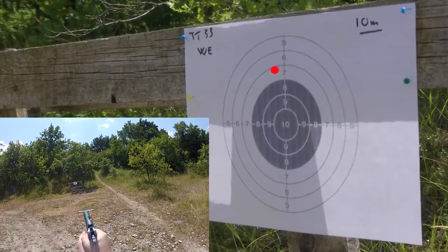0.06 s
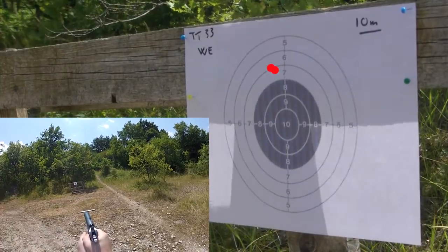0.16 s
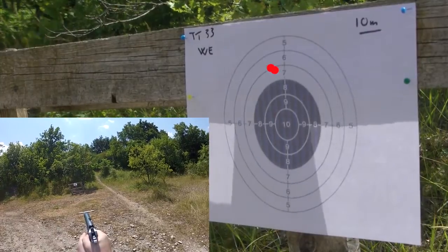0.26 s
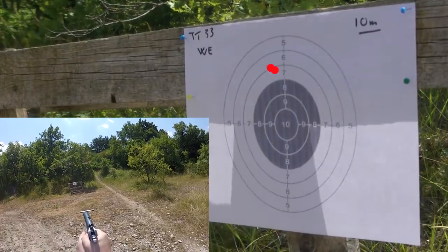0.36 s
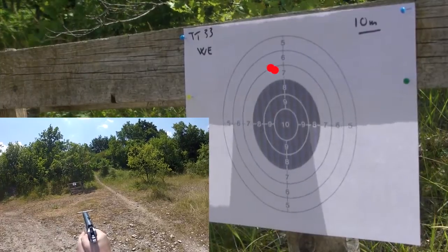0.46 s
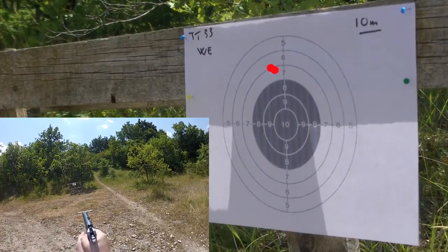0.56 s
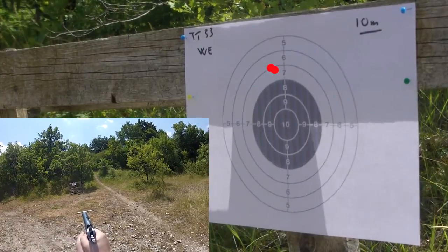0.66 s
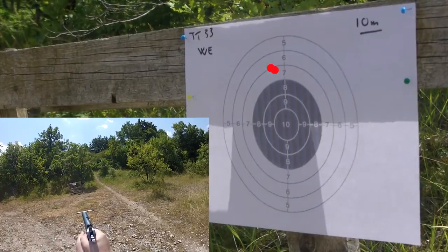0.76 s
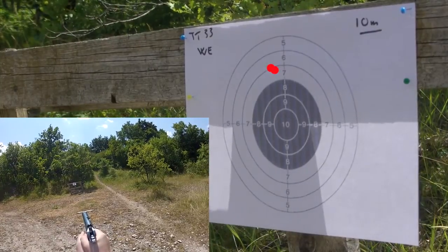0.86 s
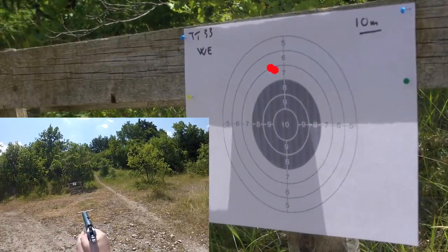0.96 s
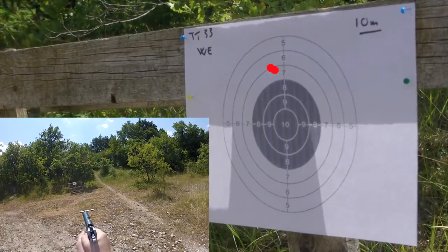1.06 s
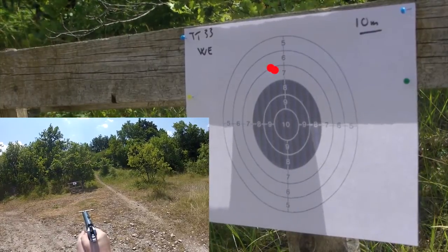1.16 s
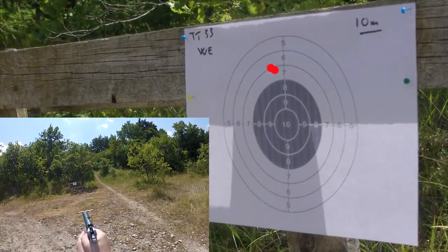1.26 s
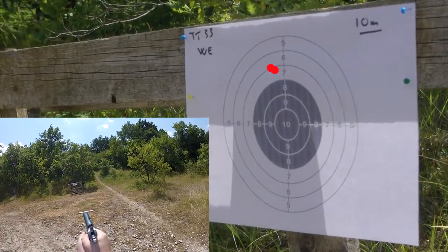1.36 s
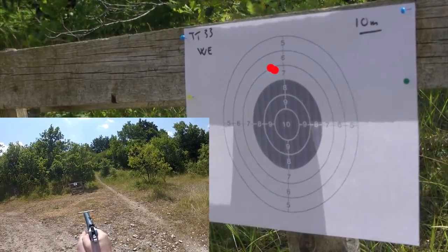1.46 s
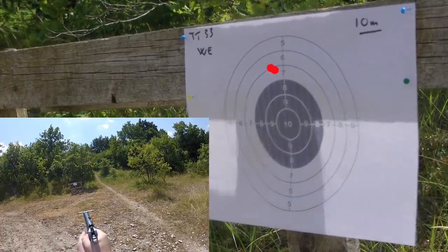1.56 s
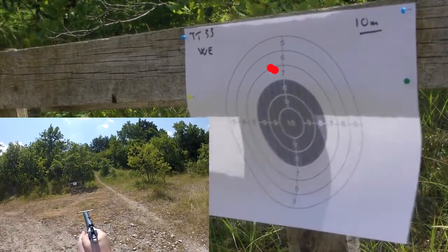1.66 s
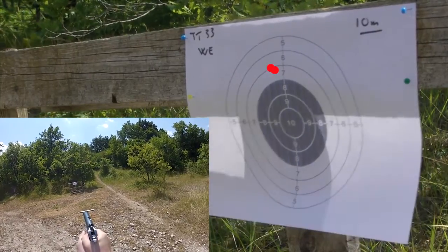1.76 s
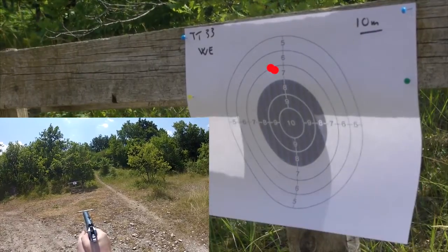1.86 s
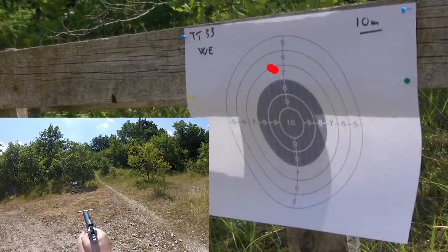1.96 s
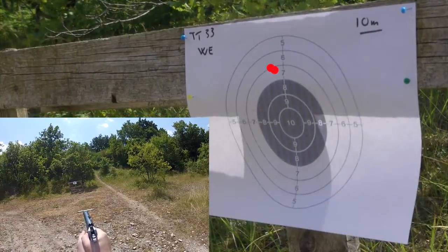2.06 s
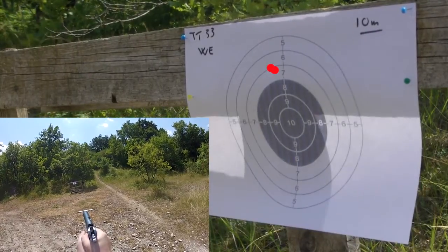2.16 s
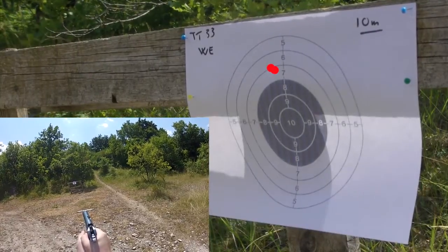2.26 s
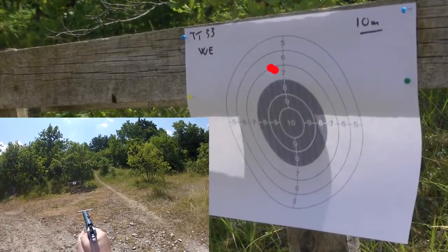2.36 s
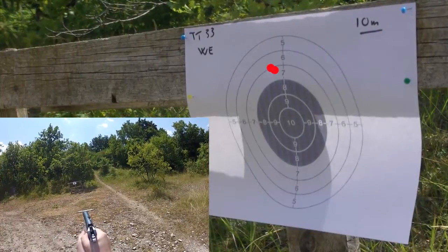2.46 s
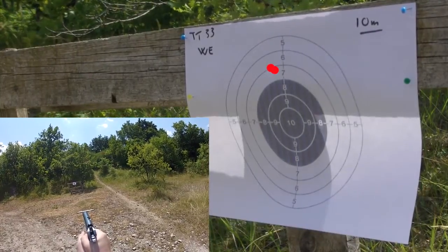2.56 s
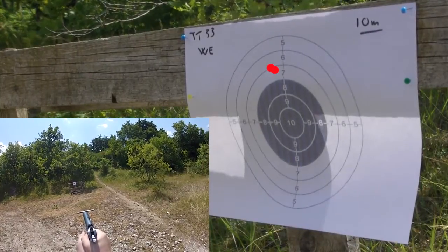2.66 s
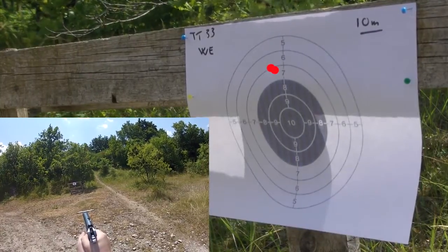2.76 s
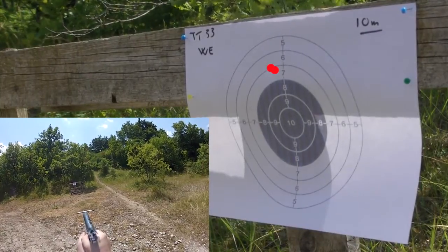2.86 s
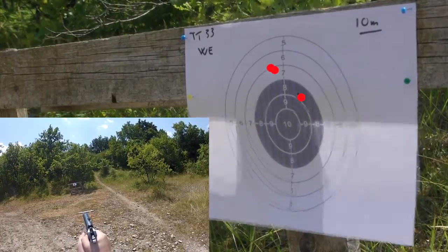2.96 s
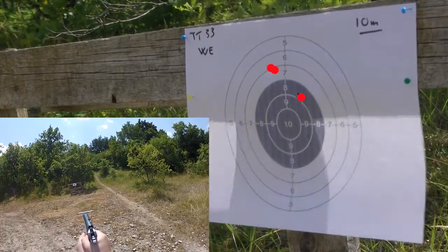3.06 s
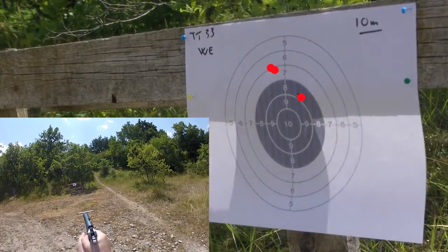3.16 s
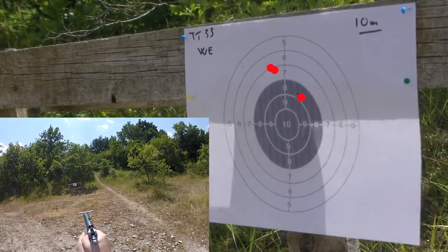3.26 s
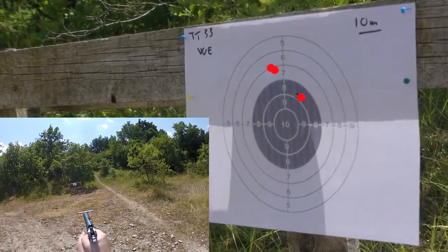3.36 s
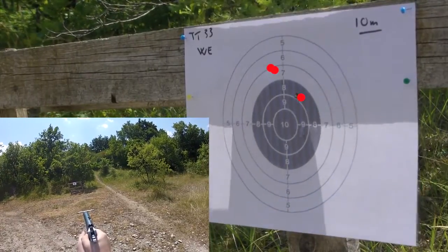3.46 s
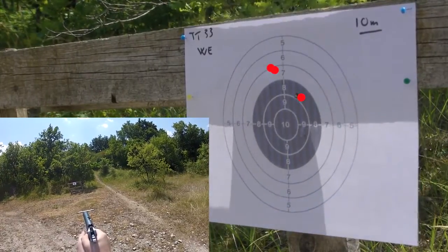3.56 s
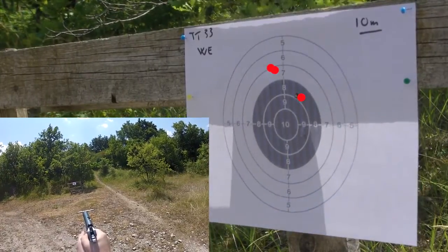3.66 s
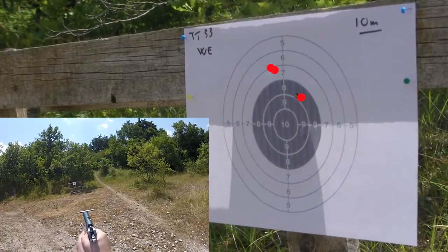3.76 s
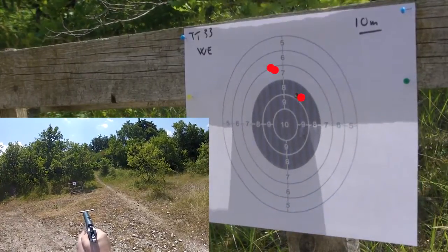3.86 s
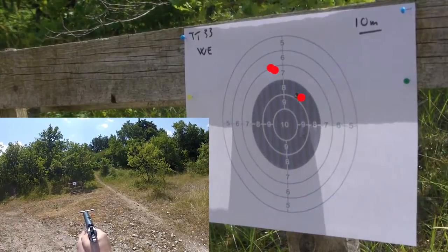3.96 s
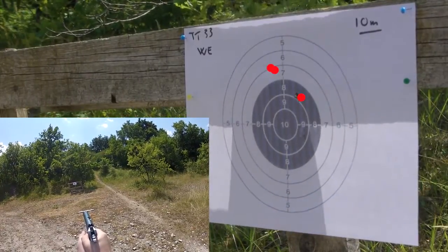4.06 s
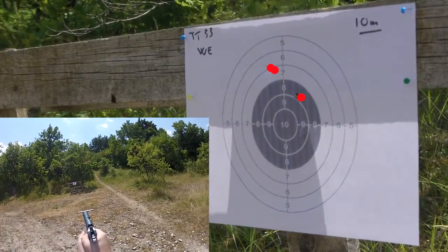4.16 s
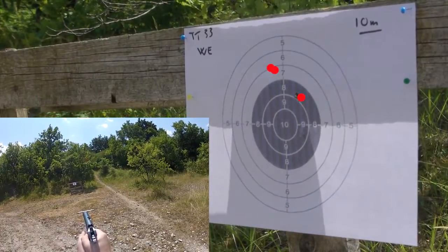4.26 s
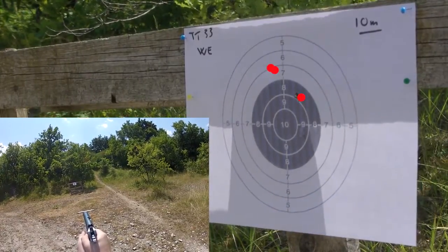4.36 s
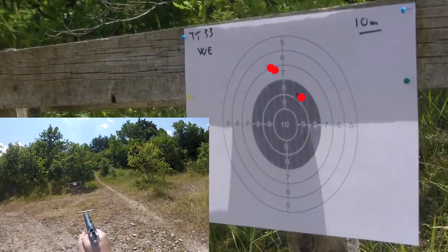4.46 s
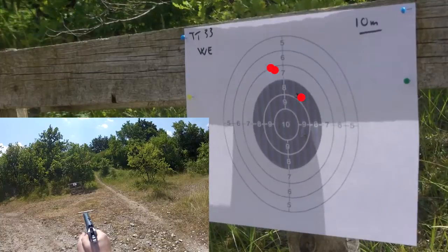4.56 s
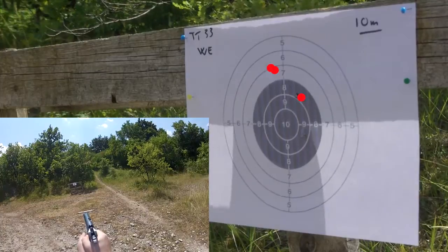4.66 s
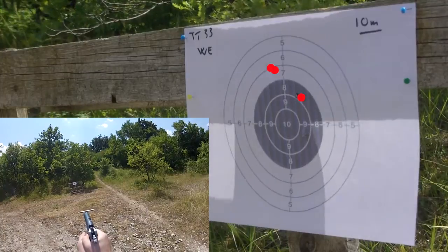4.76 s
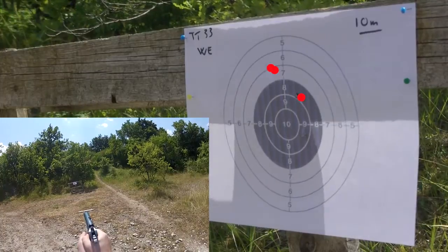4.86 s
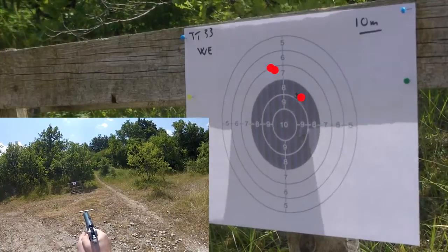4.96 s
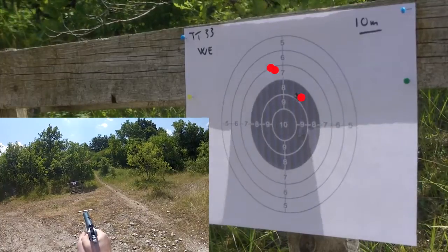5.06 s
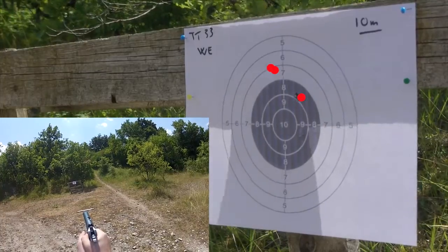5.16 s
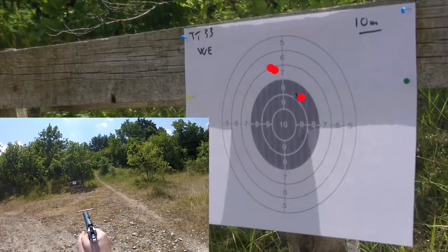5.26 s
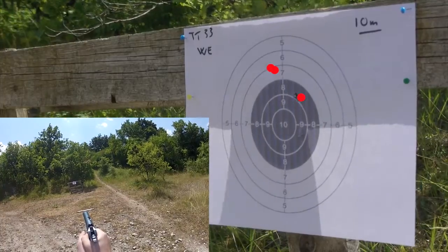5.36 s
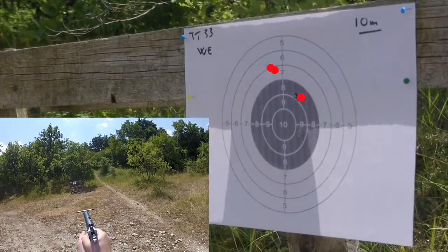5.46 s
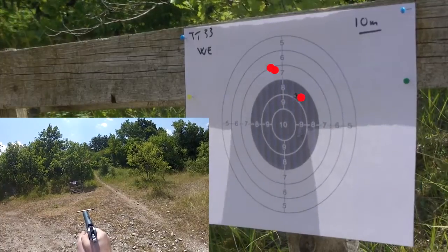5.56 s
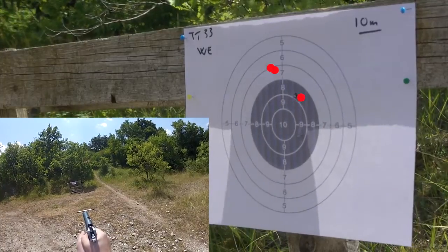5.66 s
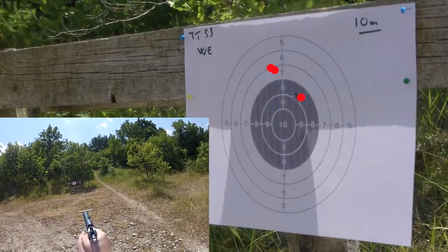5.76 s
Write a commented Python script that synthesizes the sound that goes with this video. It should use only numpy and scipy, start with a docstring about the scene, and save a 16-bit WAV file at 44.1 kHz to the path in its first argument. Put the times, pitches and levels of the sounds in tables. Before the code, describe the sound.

A toy gas pistol snaps four times with metallic slide clacks; pellets smack paper and wood while wind buffets the microphones.

```python
"""A gas blowback toy pistol fires four slow shots at a paper target on a wooden rail in open scrubland.
Wind rumble, eddy thumps, hiss and a faint whine run throughout. Each shot: gas bursts and low suction, then
the slide's slam, then bush echoes. The first three pellets crack on the target, ring the rail and rattle the
paper; small bounces follow, and are all that follows the fourth shot. One camera stands by the shooter, one by
the target; their sounds are mixed. The target camera cuts its gain on loud sounds and recovers slowly."""
import sys
import numpy as np
from scipy import signal
from scipy.fft import rfft, irfft
from scipy.io import wavfile
from scipy.ndimage import uniform_filter1d

SR = 44100
rng = np.random.default_rng(int(sys.argv[2]) if len(sys.argv) > 2 else 0)


def write(x):
    x = np.atleast_2d(x).T
    wavfile.write(sys.argv[1], SR, np.round(np.clip(x, -1, 1) * 32767).astype(np.int16))


N = 255780

# pan_db is left over right throughout
# wind level at the two ports: time_s, left_db, right_db
WIND_LEVELS = [(0, -55, -48), (.3, -38, -45.5), (.55, -41, -50), (.68, -53, -57), (.85, -42, -40.5),
               (1.17, -36.5, -41.5), (1.45, -49, -53.5), (1.801, -44, -49), (2.35, -53.5, -54),
               (2.55, -36.5, -43.5), (2.76, -36.5, -38.5), (2.999, -39, -46), (3.2, -35.5, -42),
               (3.55, -41.5, -41.5), (3.8, -43, -45), (4.172, -57, -53), (4.65, -43.5, -51),
               (5.0, -52, -43), (5.45, -53.5, -57), (5.65, -42.5, -45), (5.8, -55, -54)]
# wind spectrum: freq_hz, density_db_per_hz
WIND_SPECTRUM = [(15, 0.5), (40, 6), (90, 2.5), (150, -2), (200, -8), (300, -20), (500, -68)]
# single eddies thumping the microphone: center_s, peak_db, freq_hz, half_width_cycles, pan_db
EDDIES = [(0.366, -33.5, 108, 1.06, 14.5), (0.846, -43, 132, 1.2, 11), (1.095, -40.5, 203, 0.87, 1),
          (1.286, -31, 168, 0.61, 7), (3.216, -35.5, 71, 0.44, 15), (3.289, -37, 70, 0.74, 6),
          (3.759, -35.5, 155, 0.55, 8), (3.913, -40.5, 163, 0.92, -2), (4.049, -42.5, 55.8, 0.88, 7),
          (4.951, -40.5, 116, 0.72, -9), (5.684, -35, 168, 0.59, 9)]
# hiss spectrum: freq_hz, density_db_per_hz
HISS_SUM = [(88, -68), (150, -7.5), (186, -5.5), (239, -5), (274, -3), (360, -3), (511, -2), (1200, -5),
            (1300, -8.5), (2720, -9), (13400, -19.5), (15700, -36.5)]
# strong, as the ports are subtracted to widen the image: freq_hz, density_db_per_hz
HISS_DIFFERENCE = [(88, -23), (150, 0), (179, -1), (315, -0.5), (601, -2.5), (759, -3), (2700, -17.5),
                   (3700, -21.5), (13400, -32), (16000, -86)]
# target camera electronics, before its gain control: freq_hz, peak_db, left_lead_rad
WHINE_TONES = [(10492, -78, .6), (13124, -64, 2.4), (13964, -81, .6)]
# color of bush echoes: freq_hz, level_db
SCRUB_COLOR = [(300, -39), (1000, -9), (2500, -7.5), (5000, -1.5), (5750, 0), (6500, -1.5), (8000, -1.5),
               (12000, -7.5), (16000, -17)]
# left-right likeness of bush echoes: freq_hz, likeness (0-1)
SCRUB_LIKENESS = [(300, 0.55), (1500, 0.95), (3000, 0.69), (7000, 0.092), (15000, 0.23)]
# rail modes: freq_hz, level_db, t60_s (before ring_share)
RAIL_MODES = [(1126, -5, 0.028), (1647, -12, 0.07), (2110, -2.5, 0.058), (2800, -2, 0.025),
              (3640, -2.5, 0.03), (4440, -24, 0.027)]
# color of the paper rattle: freq_hz, level_db
PAPER_COLOR = [(500, -3), (1200, -7), (3000, -5.5), (6000, -2), (10000, -2), (16000, -23)]
# pellets hitting the target: start_s, crack_db, crack_hz, second_lag_s, second_db, rail_db, rail_place (0-1),
# rattle_db, thud_db, far_crack_db, far_rail_db; second, rail and rattle are relative to the crack
TARGET_STRIKES = [(0.1281, 3.5, 6500, .00137, -3.5, -9.5, 0.27, -7.5, -15.5, -9, -20),
                  (1.4675, -2.5, 7240, 0.00073, -25, -35, 0.15, -15, -36, -16, -32),
                  (2.96, 4, 7840, .0012, -2, -15, 0.19, -12, -37, -11.5, -8)]
# spent pellets and chips near the target: start_s, crack_db, crack_hz, rattle_db (re crack), rattle_t60_s
PELLET_BOUNCES = [(.162, -23, 5370, 10, .02), (0.38, -31, 3500, -5, .036), (1.421, -24, 5000, -7, 0.018),
                  (1.619, -21, 6900, -5, .026), (1.6247, -17, 6700, 2, 0.0093),
                  (2.1017, -41.5, 8200, 0, 0.038), (2.2315, -38.5, 9000, -2.5, .015),
                  (3.017, -22, 9000, 3, 0.021), (4.5781, -23, 6100, -7.5, 0.045),
                  (4.6114, -21, 6600, 1, 0.042), (4.62, -21.5, 8200, -5, 0.068)]
# shots: blast_s, gas_db, slam_lag_s, slam_db, draught_db (left port), suction_pan_db
SHOT_ROWS = [(.0215, 0, .047, -14.5, -9, 2.5), (1.3018, -0.5, 0.044, -12, -8, 2),
             (2.8539, 0, .0453, -12, -20, 4), (4.4479, 0.5, 0.046, -10.5, 2.5, -5)]
# trigger, valve, muzzle blast, slide flung back, vent, last hiss:
# lag_s (from blast), level_db, rise_s, t60_s, pan_db
GAS_BURSTS = [(-.012, -22, 0.00073, 0.0098, 9.5), (-.0057, -14, 0.0018, 0.041, -7),
              (0, 1.5, .0017, 0.027, 7), (.0068, -2.5, 0.0012, 0.0088, -3.5),
              (0.0102, 2.5, 0.00087, 0.0087, -8.5), (.014, -10.5, .001, 0.031, 2.5)]
# slide slams home, then bounces: lag_s (from slam), level_db (re slam), rise_s, t60_s, pan_db
SLIDE_SLAMS = [(0, 0, 0.00021, 0.022, -2), (.005, -14.5, 0.00037, 0.064, 0)]
# barrel puff, suction, its slow swing: lag_s (from blast), depth_db, freq_hz, t60_s
PRESSURE_DIPS = [(.0016, -9.5, 395, .03), (.0077, -3, 165, .022), (.0012, -14, 58, .05)]
# gas noise, sum and difference of the ports: freq_hz, density_db_per_hz
GAS_SUM = [(150, -21), (290, -9.5), (500, -3.5), (750, -4), (1050, 1), (1510, -3), (1980, -2), (2260, -2),
           (2500, -3.5), (4660, 1.5), (8830, -7), (12900, -14), (16000, -66)]
GAS_DIFFERENCE = [(290, -38), (500, -1), (1140, -8.5), (1440, -10), (1980, -11), (2810, -6), (3340, -4.5),
                  (4530, -4), (5470, 4.5), (7310, -3), (9920, -3), (16000, -31)]
# slide noise, sum and difference of the ports: freq_hz, density_db_per_hz
METAL_SUM = [(290, -51), (500, -25), (761, -27), (1060, -24), (1870, -12.5), (3810, -3), (4660, -8),
             (5020, -3), (12000, -16.5), (16000, -38)]
METAL_DIFFERENCE = [(290, -84), (500, -54), (1320, -27), (2190, -22), (2890, -8), (3440, -18), (3750, -9),
                    (4660, -6), (6700, -2), (16000, -23.5)]
# pistol frame modes: freq_hz, level_db, t60_s
FRAME_MODES = [(1130, -13.5, 0.026), (1964, -16.5, 0.051), (2555, -9, 0.051), (3000, -8.5, 0.035),
               (4010, -21, 0.1), (5580, -33, 0.028)]

CARRY_S = .0447  # way from target to shooter, and the offset between the cameras
THUD_HZ, THUD_T60_S, RATTLE_T60_S = 420, .0078, .05
SKIP_S, SKIP_DB, BOUNCE_RAIL_DB, BOUNCE_PLACE = .00128, -9, -14, .33  # place along the rail, 0-1
FAR_PLACE, FAR_HZ, FAR_RATTLE_DB, FAR_T60_S = .506, 6250, -11.5, .022
DRAUGHT_S, DRAUGHT_HZ, DRAUGHT_T60_S = .0029, 190, .014  # vented gas reaches the left port alone
THRESHOLD_DB, RECOVERY_DB_PER_S, SLOPE = -29.5, 46, .7  # recovery before the slope
CLIP_LEVEL, EDGE_HZ = .9, 16200


def amp(db):
    """Gain of a dB value."""
    return 10 ** (np.asarray(db) / 20)


def evened(x):
    """Scaled to rms 1."""
    return x / np.sqrt(np.mean(x ** 2) + 1e-20)


def read(points, hz):
    """A table read on a log-frequency axis."""
    f, value = np.transpose(points)
    return np.interp(np.log(hz + 1), np.log(f + 1), value)


def add(mix, s, sound):
    """Mixes a sound in at s seconds."""
    part = mix[..., round(s * SR):][..., :sound.shape[-1]]
    part += sound[..., :part.shape[-1]]


def sides(pan_db):
    """Left and right gains."""
    return amp([[pan_db / 2], [-pan_db / 2]])


def pair_noise(size, mid, side, side_db, tied):
    """Noise at two close ports: the difference runs a quarter turn behind the sum as far as it is tied to it."""
    hz = np.fft.rfftfreq(size, 1 / SR)
    a, b = rfft(rng.standard_normal((2, size)))
    total = a * amp(read(mid, hz))
    mixed = tied * a + np.sqrt(1 - tied ** 2) * b
    gap = -1j * mixed * amp(read(side, hz) + side_db)
    return evened(irfft(np.array([total + gap, total - gap]), size))


def ring(modes, size):
    """Impulse response of a set of modes: decaying sines."""
    t = np.arange(size) / SR
    return sum(amp(db - 60 * t / t60) * np.sin(2 * np.pi * hz * t) for hz, db, t60 in modes)


def wind():
    """Lumpy low rumble, mostly separate at each port and a little opposed."""
    hz = np.fft.rfftfreq(N, 1 / SR)
    s, *levels_db = np.transpose(WIND_LEVELS)
    left, other = irfft(rfft(rng.standard_normal((2, N))) * amp(read(WIND_SPECTRUM, hz)), N)
    right = other - .62 * left
    lumps = uniform_filter1d(uniform_filter1d(rng.standard_normal((2, N)), 1500), 1500)
    rumble = np.array([evened(left), evened(right)]) * amp(4.6 * evened(lumps))
    return evened(rumble) * amp([np.interp(np.arange(N) / SR, s, db) for db in levels_db])


def eddy_thumps():
    """Each eddy is a short low wave packet, its phase slightly different at each port."""
    out, t = np.zeros((2, N)), np.arange(-2000, 2000) / SR
    for s, db, hz, cycles, pan_db in EDDIES:
        phase_cycles = rng.random((2, 1)) * .089
        packet = np.cos(2 * np.pi * (hz * t + phase_cycles)) * np.exp(-(t * hz / cycles) ** 2)
        add(out, s + t[0], amp(db) * packet * sides(pan_db))
    return out


def electronic_whine():
    """Steady high sines; the left port leads in phase."""
    t = np.arange(N) / SR
    return sum(amp(db) * np.sin(2 * np.pi * hz * t + np.array([[lead], [0]])) for hz, db, lead in WHINE_TONES)


def echoes(x, db, t60, onset, air_hz):
    """Scattering off countless leaves: the sound's energy returns as noise that builds up and dies, treble first."""
    hop = 64
    frames, hz, t = N // hop + 4, np.fft.rfftfreq(256, 1 / SR)[:, None], np.arange(700) * hop / SR
    energy = np.bincount(np.arange(N) // hop, (x ** 2).mean(0), frames)
    fade_s = t60 / (1 + (hz / air_hz) ** 2)  # air eats the treble
    buildup = 1 - np.exp(-(t / onset) ** 2)
    shape = (amp(read(SCRUB_COLOR, hz) - 60 * t / fade_s) * buildup) ** 2
    power = signal.fftconvolve(energy[None], shape / shape.sum(), axes=1)[:, :frames]
    a, b, c, d, clumps = rng.standard_normal((frames, len(hz), 5)).T
    clumps = uniform_filter1d(clumps, size=20, axis=0)
    clumps = evened(uniform_filter1d(clumps, size=6, axis=1))  # single bushes stand out
    same = read(SCRUB_LIKENESS, hz)
    left = a + 1j * b
    right = same * left + np.sqrt(1 - same ** 2) * (c + 1j * d)
    bins = np.array([left, right]) * np.sqrt(abs(power)) * amp(2.5 * clumps)
    return amp(db) * signal.istft(bins, nperseg=256, noverlap=192)[1][:, :N]


def rail_ring(place, ring_share, size):
    """Rail modes; a blow near a node of a mode leaves that mode quiet."""
    rail = np.zeros(size)
    for k, (hz, db, t60) in enumerate(RAIL_MODES):
        coupling = abs(np.sin(np.pi * (k + 1) * place))
        rail += coupling * ring([(hz, db, ring_share * t60)], size)
    return rail


def strikes(rows, ring_share):
    """One-cycle crack, second contact, ringing rail and paper rattle; so small a pellet makes no bass."""
    out, t, lead_s = np.zeros((2, N)), np.arange(3000) / SR, 8 / SR
    for s, db, hz, later, second_db, rail_db, place, rattle_db, t60 in rows:
        u = np.pi * hz * (t - lead_s)
        crack = (1 - 2 * u ** 2 - 1.48 * u) * np.exp(-u ** 2)
        noise = pair_noise(len(t), PAPER_COLOR, PAPER_COLOR, side_db=-4.5, tied=.17)
        rattle = amp(rattle_db - 60 * t / t60) * noise
        hit = crack + amp(rail_db) * rail_ring(place, ring_share, len(t))
        add(out, s - lead_s, amp(db) * (hit + rattle))
        add(out, s - lead_s + later, amp(db + second_db) * hit)
    return signal.sosfilt(signal.butter(3, 850, "high", fs=SR, output="sos"), out)


def far_hits():
    """The hard strikes after their way back to the shooter; from there the rail sounds drier."""
    rows = [(s + CARRY_S, far_db, FAR_HZ, later, second_db, rail_db, FAR_PLACE, FAR_RATTLE_DB, FAR_T60_S)
            for s, _, _, later, second_db, *_, far_db, rail_db in TARGET_STRIKES]
    return strikes(rows, ring_share=.6)


def near_hits():
    """Strikes and bounces right by the target camera; a hard strike also thuds the rail's post."""
    hard = [(*row[:8], RATTLE_T60_S) for row in TARGET_STRIKES]
    soft = [(s, db, hz, SKIP_S, SKIP_DB, BOUNCE_RAIL_DB, BOUNCE_PLACE, rattle_db, t60)
            for s, db, hz, rattle_db, t60 in PELLET_BOUNCES]
    thuds = np.zeros((2, N))
    for row in TARGET_STRIKES:
        add(thuds, row[0], ring([(THUD_HZ, row[8], THUD_T60_S)], size=1000))
    return strikes(hard + soft, ring_share=1) + thuds


def gain_control(heard):
    """Level over a threshold turns the gain down: quick fall, slow recovery."""
    power = uniform_filter1d((heard ** 2).mean(0), size=100, origin=45)
    power_db = 10 * np.log10(abs(power) + 1e-12)
    recovery_db = np.arange(N) / SR * RECOVERY_DB_PER_S
    held_db = np.maximum.accumulate(power_db + recovery_db) - recovery_db
    over_db = np.maximum(held_db - THRESHOLD_DB, 0)
    return heard / amp(SLOPE * uniform_filter1d(over_db, 260, origin=120))


def knocks(rows, noise, ring_db, sputter_db):
    """Sputtering noise under a quick rise and decay for each row; the pistol frame rings along."""
    envelope, t = np.zeros((2, N)), np.arange(4000) / SR
    for s, db, rise, t60, pan_db in rows:
        add(envelope, s, amp(db - 60 * t / t60) * (1 - np.exp(-t / rise)) * sides(pan_db))
    sputter = evened(uniform_filter1d(rng.standard_normal(N), size=14))
    out = envelope * noise * evened(amp(sputter_db * sputter))
    frame = signal.oaconvolve(out.mean(0), ring(FRAME_MODES, size=3000))[:N]
    return out + amp(ring_db) * frame


def gas_bursts():
    """Gas released at each stage of the firing cycle."""
    rows = [(s + lag, gas_db + db, *rest)
            for s, gas_db, *_ in SHOT_ROWS for lag, db, *rest in GAS_BURSTS]
    noise = pair_noise(N, GAS_SUM, GAS_DIFFERENCE, side_db=2, tied=.66)
    return knocks(rows, noise, ring_db=-28.5, sputter_db=2.5)


def slide_slams():
    """The metal slide slams home and bounces."""
    rows = [(s + home + lag, slam_db + db, *rest)
            for s, _, home, slam_db, *_ in SHOT_ROWS for lag, db, *rest in SLIDE_SLAMS]
    noise = pair_noise(N, METAL_SUM, METAL_DIFFERENCE, side_db=1.5, tied=.48)
    return knocks(rows, noise, ring_db=-28, sputter_db=2)


def suction():
    """Low decaying swings that dip first, plus the draught on the left port."""
    low = np.zeros((2, N))
    for s, *_, draught_db, pan_db in SHOT_ROWS:
        for lag, db, hz, t60 in PRESSURE_DIPS:
            add(low, s + lag, -ring([(hz, db, t60)], size=4000) * sides(pan_db))
        add(low[0], s + DRAUGHT_S, -ring([(DRAUGHT_HZ, draught_db, DRAUGHT_T60_S)], size=4000))
    return low


def pistol():
    """Each shot runs the same cycle: gas bursts, metal slams and low suction."""
    return gas_bursts() + slide_slams() + suction()


def target_camera(shots):
    """Near strikes, distant shots, their echoes and self-noise, all through the gain control."""
    hits = near_hits()
    heard = hits + echoes(hits, db=-24.5, t60=.58, onset=.0034, air_hz=11500)
    heard = heard + amp(-18.5) * shots + echoes(shots, db=-40.5, t60=1.4, onset=.095, air_hz=8300)
    hiss = amp(-44) * pair_noise(N, HISS_SUM, HISS_DIFFERENCE, side_db=11, tied=0)
    return gain_control(heard + hiss + electronic_whine())


def shooter_camera(shots):
    """Near shots with their echoes, far strikes and a fainter hiss."""
    hiss = amp(-56.5) * pair_noise(N, HISS_SUM, HISS_SUM, side_db=-5.5, tied=0)
    return shots + echoes(shots, db=-37.5, t60=.82, onset=.012, air_hz=12000) + far_hits() + hiss


def scene():
    """Both cameras mixed, with the wind on top."""
    shots = pistol()
    return shooter_camera(shots) + target_camera(shots) + wind() + eddy_thumps()


def record(dry):
    """Peaks clip at CLIP_LEVEL, then a band limit and a full-scale clip."""
    edge = signal.firwin(511, EDGE_HZ, window=("kaiser", 9), fs=SR)[None]
    limited = signal.oaconvolve(np.clip(dry, -CLIP_LEVEL, CLIP_LEVEL), edge, "same")
    return np.clip(limited, -1, 1)


dry = scene()
out = record(dry)
write(out)
```